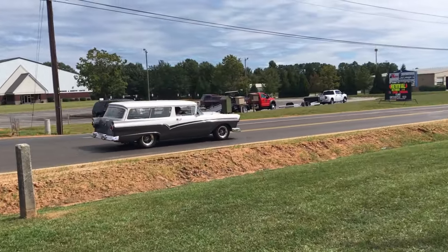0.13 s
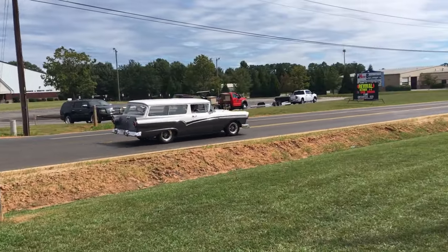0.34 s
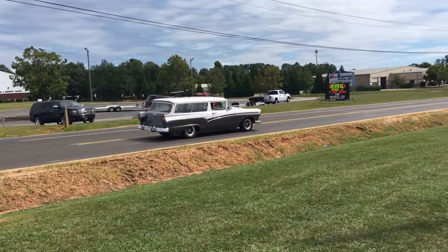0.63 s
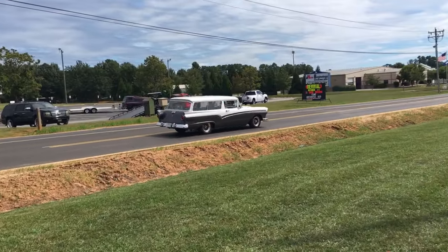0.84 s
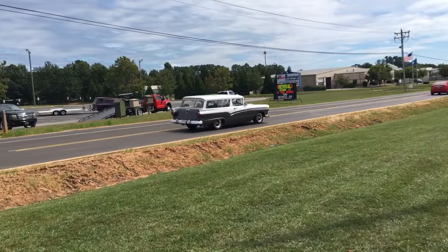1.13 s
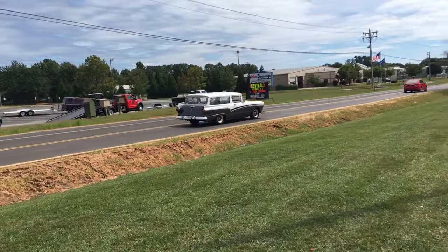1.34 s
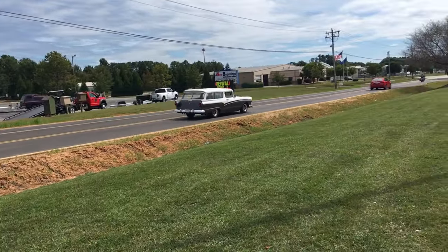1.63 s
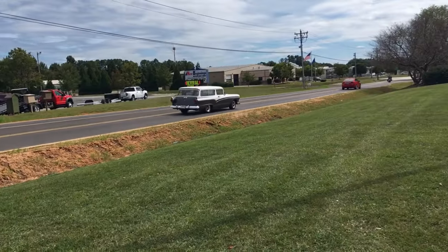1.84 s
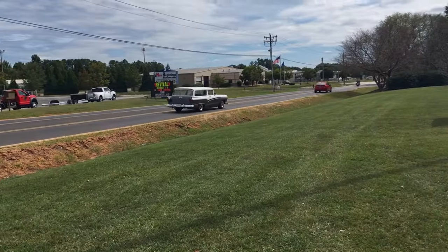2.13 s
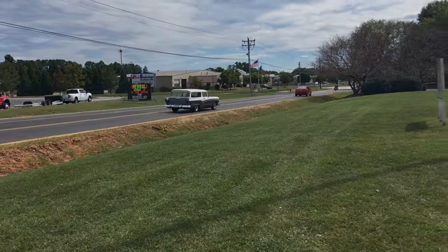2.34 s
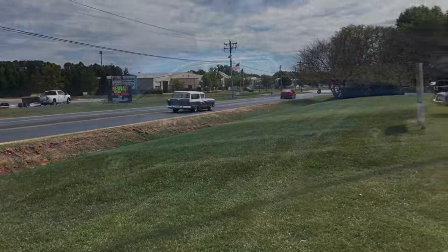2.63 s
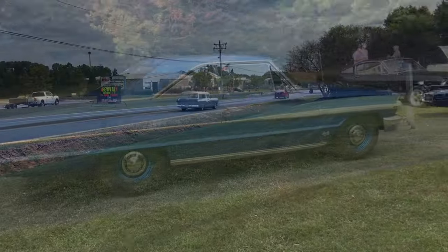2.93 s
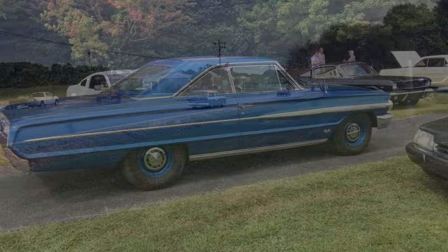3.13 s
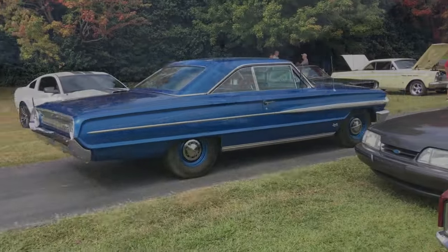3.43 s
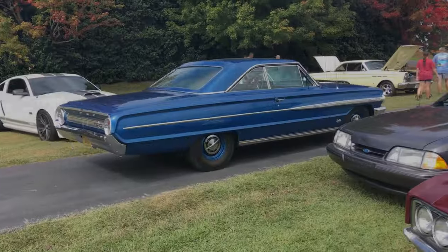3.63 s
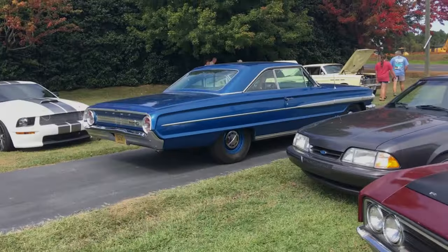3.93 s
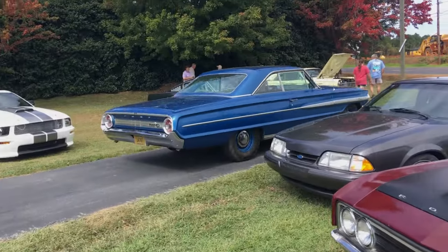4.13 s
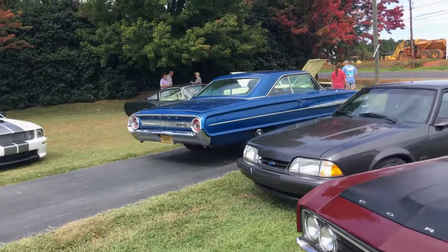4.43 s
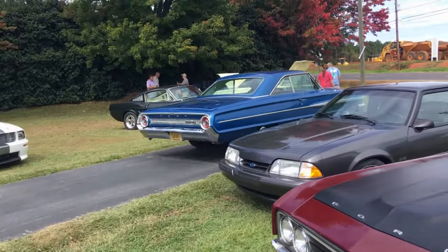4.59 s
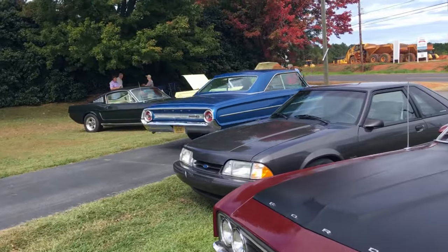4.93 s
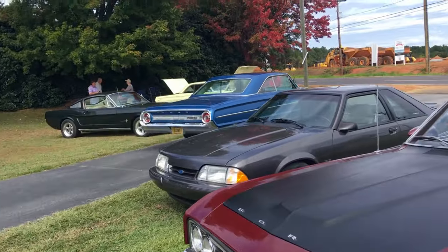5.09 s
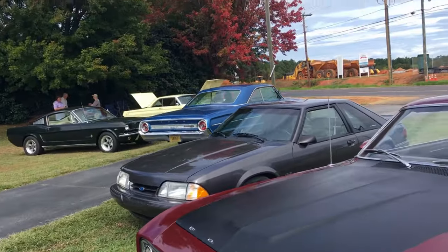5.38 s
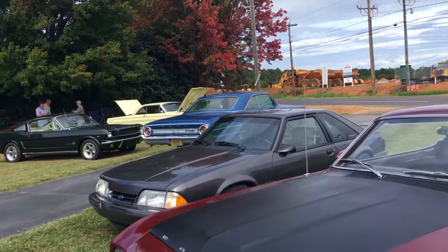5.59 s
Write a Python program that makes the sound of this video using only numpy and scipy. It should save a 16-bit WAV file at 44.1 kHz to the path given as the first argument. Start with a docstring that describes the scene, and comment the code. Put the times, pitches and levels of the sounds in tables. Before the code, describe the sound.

Outdoors at a roadside, a low rumble of distant traffic runs throughout. From the start, a classic V8 station wagon pulls away close by, its deep, uneven exhaust note rising slightly in pitch. The tailpipe rasps, pops and hisses over the roar of the tyres, and the car grows gradually quieter as it draws off. At about 2.7 seconds it lifts off the throttle, the pitch drops, and it fades out by 4 seconds. From around 3 seconds a second V8 blends in, creeping past at a slower, lumpy idle with brief stumbles. Its exhaust leaks hiss, spit and tick in step with the throb, and a loose metal part rattles lightly from about 3.4 seconds. Engine clatter grows stronger near 4.4 seconds and continues until the end, just before 6 seconds, with faint low drones in the distance.

```python
"""Roadside, outdoors, one microphone, over a low rumble of road and distant traffic. Close by, a V8 estate
car pulls away: its uneven firings sound the exhaust note and ring the pipe, the gas jet rasps, pops and
hisses, the tyres roar. At about 2.7 s, far off, it lifts off the throttle and fades. The sound dissolves
into a second V8 creeping past at a lumpy idle, its engine bay clattering, its exhaust leaks spitting
in step and a loose metal part rattling, with faint drones in the distance."""
import sys
import numpy as np
from scipy import signal
from scipy.fft import rfft, irfft, next_fast_len
from scipy.io import wavfile

SR = 44100
rng = np.random.default_rng(int(sys.argv[2]) if len(sys.argv) > 2 else 0)


def int16_out(signal):
    """Quantize to a 16-bit WAV file."""
    q = np.round(np.clip(np.atleast_2d(signal).T, -1, 1) * 32767)
    wavfile.write(sys.argv[1], SR, q.astype(np.int16))


N = 253559

# each bank fires unevenly, 270-180-90-180 degrees; per firing: (bank [0 near, 1 far])
FAR_BANK = [0, 1, 1, 0, 1, 0, 0, 1]
# tailpipe resonances: (frequency [Hz], width [Hz], level [dB])
TAILPIPE_MODES = [(1896, 150, -7), (2010, 194, -2.5), (2296, 400, -0.5), (2776, 500, -4), (2840, 1570, -10)]


def from_db(db):
    """Decibels to gain."""
    return 10 ** (np.asarray(db) / 20)


def rms_one(x):
    """Scale to rms 1."""
    return x / np.sqrt(np.mean(x ** 2) + 1e-20)


def in_time(rows):
    """Each column of a curve, sample by sample."""
    s, *columns = np.transpose(rows)
    return [np.interp(np.arange(N) / SR, s, c) for c in columns]


def drift(rate_hz):
    """Smooth random wander, rms 1."""
    r = np.exp(-80 * np.pi * rate_hz / SR)
    slow = signal.lfilter([1], [1, -2 * r, r * r], rng.standard_normal(N // 40 + 2002))[2000:]
    return np.interp(np.arange(N) / 40, np.arange(len(slow)), rms_one(slow))


def coloured(spectrum):
    """Noise with the given spectrum, rms 1."""
    hz, db = np.transpose(spectrum)
    size = next_fast_len(N)
    grid = np.maximum(np.fft.rfftfreq(size, 1 / SR), 1)
    gain = from_db(np.interp(np.log(grid), np.log(hz), db))
    return rms_one(irfft(rfft(rng.standard_normal(size)) * gain, size)[:N])


def resonances(x, modes):
    """Parallel resonators of alternating sign, each applied twice; rms 1."""
    out = 0
    for k, (hz, width, db) in enumerate(modes):
        r = np.exp(-np.pi * width / SR)
        b = (1 - r * r) / 2 * np.array([1, 0, -1])
        a = [1, -2 * r * np.cos(2 * np.pi * hz / SR), r * r]
        out += (-1) ** k * from_db(db) * signal.lfilter(b, a, signal.lfilter(b, a, x + 1e-18))
    return rms_one(out)


def puffs(clicks, decay_s, rise_s=.0035):
    """Each click opens quickly and dies away."""
    rise, decay = np.exp(-1 / (rise_s * SR)), np.exp(-1 / (decay_s * SR))
    return signal.lfilter([1 - rise], np.convolve([1, -rise], [1, -decay]), clicks + 1e-18)


def struck(events, modes, decay_s, scatter_db, rise_s=.0051, lean_db_per_octave=10):
    """Each event (s, dB, perhaps Hz) is a dying gust in every mode, weaker away from its own pitch."""
    s, level_db, *pitch = np.transpose(list(events))
    chance, gust, out = rng.standard_normal((len(s), len(modes))), rng.standard_normal(N), 0
    for k, (hz, width, db) in enumerate(modes):
        lean_db = sum(lean_db_per_octave * np.abs(np.log2(hz / own_hz)) for own_hz in pitch)
        clicks = np.zeros(N)
        clicks[(s * SR).astype(int)] = from_db(level_db + db - lean_db + scatter_db * chance[:, k])
        out += resonances(gust, [(hz, width, db)]) * puffs(clicks, decay_s, rise_s)
    return out


def tones(curves, waver_db):
    """One wavering sine for each curve of pitch and level."""
    out = 0
    for hz, db in map(in_time, curves):
        out += from_db(db + waver_db * drift(6)) * np.sin(2 * np.pi * np.cumsum(hz) / SR)
    return np.sqrt(2) * out


def shelf(x, top_db, corner_hz):
    """Change the level above the corner."""
    low = signal.sosfiltfilt(signal.butter(2, corner_hz, fs=SR, output="sos"), x)
    return low + from_db(top_db) * (x - low)


def jet_flutter(gusts_db=.9, grit_db=1.2):
    """Gain of a jet of gas: slow gusts and fast grit."""
    return from_db(gusts_db * drift(2.5) + grit_db * drift(130))


def crossings(turns):
    """Samples at which a running count passes a whole number."""
    return np.flatnonzero(np.diff(np.floor(turns))) + 1


def arrivals(start, lag):
    """Where in the cycle each firing reaches the microphone; the far bank's pipe lags."""
    return start + np.arange(8) / 8 + lag * np.array(FAR_BANK)


def firings(cycles, slot_db, start, lag, share, uneven_db):
    """One click a firing, its strength set by a share of its slot's level and by chance."""
    clicks, chance = np.zeros(N), rng.standard_normal(N)
    for db, turn in zip(slot_db, arrivals(start, lag)):
        at = crossings(cycles - turn)
        clicks[at] = from_db(share * db + uneven_db * chance[at])
    return clicks


def exhaust_note(cycles, levels_db, first_order, wobble_db, slot_db, start, lag, wander_rad=.35):
    """Multiples of the cycle rate, phased as eight pressure dips add up; each strays a little."""
    out, power = 0, 0
    for k, db in enumerate(levels_db, first_order):
        phase = np.angle(-from_db(slot_db) @ np.exp(-2j * np.pi * k * arrivals(start, lag)))
        gain, stray = from_db(db), drift(2)
        wave = np.cos(2 * np.pi * k * cycles + phase + wander_rad * stray[::-1])
        out += gain * from_db(wobble_db * stray) * wave
        power += gain ** 2 / 2
    return out / np.sqrt(power)


def pipe_bark(pulses, stage, waver_db=1.8):
    """Pulses ring the exhaust pipe; each resonance swells and sags on its own."""
    # (frequency [Hz], width [Hz], near [dB], midway [dB], far [dB], coasting [dB])
    pipe_modes = [(211.7, 14, 1.5, -5, -21, 2), (299, 17, -6, -11, -4, -1), (352, 28, -5.5, 0, -7.5, -6),
                  (424, 27, -9, -1, -8.5, -4.5), (500.8, 18, -3, -4.5, -7.5, -12),
                  (561, 30, 0.5, -2, -7, -6), (634.3, 27, 1.5, -2.5, 5.5, 1), (704.4, 29, 4, 3.5, 2.5, 3.5),
                  (778, 26, -4, -12.5, -6, 0), (839, 32, -9, 0, -12, -21), (955, 33, 1, -13, -17, -15)]
    out = 0
    for k, (hz, width, *stage_db) in enumerate(pipe_modes):
        db = np.interp(stage, [0, .5, 1, 2], stage_db) + waver_db * drift(4)
        out += (-1) ** k * from_db(db) * resonances(pulses, [(hz, width, 0)])
    return .3 * out


def panel_ring(pulses):
    """A panel sings along with the pulses while the car is near."""
    # (time [s], level [dB])
    panel_level = [(0, -52), (.3, -50.5), (.47, -47.5), (.7, -60), (1.0, -51), (1.4, -57), (2.5, -62),
                   (2.8, -82)]
    # (frequency [Hz], width [Hz], level [dB])
    panel_modes = [(1084, 17, 10.5), (1132, 22, 1.5), (1216, 29, -8.5)]
    return from_db(in_time(panel_level)[0]) * resonances(pulses, panel_modes)


def tailpipe_rasp(jet, rasp_db, stage):
    """The jet rasps in the tailpipe, with faint whistles and a middle band that flares up."""
    # upper modes over lower: (near [dB], far [dB], coasting [dB])
    upper_db = [-6.5, -2.5, -6]
    # (frequency [Hz], width [Hz])
    whistles = [(3950, 90), (5325, 120), (6050, 140)]
    # (time [s], level of each whistle [dB])
    whistle_levels = [(0, -56, -54, -61), (.45, -67, -59, -66), (.62, -58, -60, -64), (1.1, -61, -64, -71),
                      (1.6, -60, -60, -74), (2.3, -65, -64, -65), (3.0, -84, -77, -83)]
    # (time [s], level [dB])
    flare_level = [(.3, -66), (.43, -46.5), (.62, -47.5), (.85, -49), (1.0, -55), (1.2, -51), (1.6, -54),
                   (2.0, -64), (2.7, -58), (2.9, -60), (3.1, -80)]
    # (frequency [Hz], width [Hz], level [dB])
    flare_modes = [(2120, 190, -13), (2330, 110, 1)]
    upper = from_db(np.interp(stage, [0, 1, 2], upper_db)) * resonances(jet, TAILPIPE_MODES[3:])
    out = from_db(rasp_db) * (resonances(jet, TAILPIPE_MODES[:3]) - upper)
    for (hz, width), db in zip(whistles, in_time(whistle_levels)):
        out += from_db(db) * resonances(jet, [(hz, width, 0)])
    return out + from_db(in_time(flare_level)[0]) * resonances(jet, flare_modes)


def tailpipe_pops(rasp_db, count=80, spread_db=6):
    """Pops ring the tailpipe: small ones at random, the loudest at set times."""
    # (time [s], level [dB], strongest near [Hz])
    loud_pops = [(.137, -37, 1950), (.2, -34, 2190), (.444, -39, 2280), (.482, -36, 2100),
                 (.512, -34, 2080), (.58, -32, 2030), (.646, -37, 2060), (.741, -34.5, 2260),
                 (.761, -34.5, 2100), (.813, -33, 2040), (1.064, -41, 2600), (1.092, -47, 2050),
                 (1.162, -40, 2020), (1.218, -35, 2110), (1.374, -38, 1950), (1.457, -50, 1960),
                 (1.489, -45, 2500), (1.537, -37, 1960), (1.564, -43, 2100), (1.612, -37, 2600),
                 (1.641, -34, 2300), (1.682, -36, 2130), (1.729, -39, 2600), (1.766, -33.5, 2610),
                 (1.805, -40, 2370), (1.869, -35, 2220), (2.07, -36, 3200), (2.157, -40, 3100),
                 (2.218, -31.5, 1900), (2.29, -38, 3000), (2.369, -33, 2820)]
    s = rng.uniform(0, 2.8, count)
    small_db = rasp_db[(s * SR).astype(int)] - 2.5 + spread_db * rng.uniform(-1.5, 1.5, count)
    small = struck(zip(s, small_db), TAILPIPE_MODES, decay_s=.009, scatter_db=3)
    return small + struck(loud_pops, TAILPIPE_MODES, decay_s=.011, scatter_db=1.8)


def tailpipe_ticks(clicks, rasp_db, stage, spread_db=5.5):
    """Each firing ticks sharply in the tailpipe."""
    # (frequency [Hz], width [Hz], level [dB])
    tick_modes = [(2757, 320, -2.5), (3234, 175, 3.5), (5400, 710, -9), (7200, 1500, -9.5)]
    # ticks over the rasp: (near [dB], far [dB], coasting [dB])
    over_db = [-7, 2.5, -7]
    at = np.flatnonzero(clicks)
    db = rasp_db + np.interp(stage, [0, 1, 2], over_db) + spread_db * rng.uniform(-1.6, 1, N)
    return struck(zip(at / SR, db[at]), tick_modes, decay_s=.002, scatter_db=2, rise_s=.0006)


def exhaust_hiss(cycles, clicks, swell, hiss_db, spread_db=6.5, top_db_per_s=-1):
    """Gas hisses with the firings and spits three times a cycle; distance dulls the hiss."""
    # (frequency [Hz], density [dB])
    hiss_spectrum = [(1940, -6.5), (3300, -81), (3740, -17), (4040, 0.5), (4910, 1), (5210, -2),
                     (6010, 5.5), (7860, -2.5), (8950, 3), (9800, -2.5), (10350, -9), (10900, -5),
                     (12200, 0.5), (15100, -31), (15700, -13)]
    # (place [cycles], level over the hiss [dB])
    cycle_spits = [(0.171, 1.5), (.43, -0.5), (0.533, -15)]
    # (time [s], level [dB], strongest near [Hz])
    loud_spits = [(.033, -37, 6600), (.172, -36, 6540), (.279, -38, 7500), (.36, -39, 5900),
                  (.445, -37, 6350), (.528, -35, 6000), (.773, -36, 6350), (.937, -37, 6000),
                  (1.012, -40, 6000), (1.252, -52, 5900), (1.546, -50, 5550), (2.005, -54, 5800),
                  (2.098, -40, 5940), (2.172, -41, 5700), (2.249, -40, 6130), (2.327, -49, 6800)]
    # (frequency [Hz], width [Hz], level [dB])
    spit_bands = [(2770, 390, -2), (4540, 900, 1.5), (5530, 1200, 1.5), (6830, 1060, 1), (9200, 3100, -8)]
    pulsing = 1.1 + rms_one(puffs(clicks, decay_s=.006))
    hiss = rms_one(coloured(hiss_spectrum) * jet_flutter() * swell * pulsing)
    out = from_db(hiss_db) * shelf(hiss, top_db_per_s * np.arange(N) / SR, corner_hz=9000)
    spits, chance = [], rng.uniform(-1, 1, N)
    for place, db in cycle_spits:
        at = crossings(cycles - place)
        spits += zip(at / SR, hiss_db[at] + db + spread_db * chance[at])
    out += struck(spits, spit_bands, decay_s=.0055, scatter_db=2.5)
    return out + struck(loud_spits, spit_bands, decay_s=.0039, scatter_db=3.5)


def tyre_roar(bark_db, sink_db_per_s=1):
    """Tyres roar on the road, fading a little faster than the bark."""
    # (frequency [Hz], density [dB])
    tyre_spectrum = [(170, -35), (250, -16), (320, 4.5), (420, -6.5), (600, 3), (800, 3), (1100, -5),
                     (1300, -5.5), (1550, -14), (1900, 1), (2600, -20)]
    return from_db(bark_db + 3 - sink_db_per_s * np.arange(N) / SR) * coloured(tyre_spectrum)


def road_rumble():
    """Low rumble of the road and distant traffic."""
    # (frequency [Hz], density [dB])
    rumble_spectrum = [(20, -29), (40, -13), (60, -1.5), (100, -3.5), (140, -8), (200, -14), (330, -30.5),
                       (480, -34), (700, -75)]
    # (time [s], level [dB])
    rumble_level = [(0, -37.5), (1.5, -37), (2.6, -38.5), (3.2, -41.5), (4.0, -43), (4.6, -45), (5.75, -44)]
    return from_db(in_time(rumble_level)[0]) * coloured(rumble_spectrum)


def pipe_song():
    """The pipe sings clear tones as the car draws away."""
    # per tone: (time [s], frequency [Hz], level [dB])
    pipe_tones = [
        [(1.3, 622, -72), (1.55, 630, -57), (1.9, 632, -54), (2.2, 633, -52), (2.5, 624, -66), (2.7, 625, -79)],
        [(.9, 702, -74), (1.3, 701.4, -61.5), (1.7, 704, -53.5), (1.95, 707, -55), (2.2, 700, -71)],
        [(.85, 783, -78), (1.0, 780, -58), (1.25, 799, -55), (1.45, 803, -55), (1.6, 804, -73)],
    ]
    return tones(pipe_tones, waver_db=2.5)


def leaving_car():
    """The first V8 pulls away from the microphone and coasts; its firings drive the exhaust."""
    # (time [s], note [dB], bark [dB], rasp [dB], hiss [dB])
    levels = [(0, -23, -41.5, -49, -50), (.7, -24, -43.5, -46, -52), (1.6, -24.5, -45, -46.5, -51),
              (2.3, -28.5, -48.5, -50, -52), (2.6, -30.5, -50, -55, -59.5), (2.8, -30.5, -52, -53, -61),
              (3.1, -32.5, -55.5, -60.5, -60.5), (3.6, -39.5, -70, -65, -88), (4.1, -63, -95, -70, -93)]
    # (time [s], engine speed [cycles/s])
    speed = [(0, 12.038), (.654, 12.238), (1.201, 12.643), (1.361, 12.644), (1.516, 12.904),
             (2.454, 13.469), (2.783, 11.903), (3.53, 11.051), (3.7, 10.346)]
    # (time [s], stage [0 near and pulling, 1 far and pulling, 2 coasting])
    stages = [(0, 0), (.5, 0), (1.3, .5), (2.0, 1), (2.62, 1), (2.76, 2)]
    # multiples 4 to 24 of the cycle rate: (near [dB], far [dB], coasting [dB])
    orders = [(-18, -20, -18), (-1, 1, -15), (-1, -7, -14), (-1, -7, -9), (2, -6, 0), (-4, -13, -15),
              (-12, -11, -20), (-6, 2, -17), (-18, -23, -18), (-8, -8, -13), (-17, -30, -20),
              (-17, -25, -23), (-21, -16, -30), (-16, -27, -24), (-22, -28, -28), (-22, -26, -30),
              (-28, -33, -30), (-34, -32, -40), (-33, -24, -36), (-28, -28, -24), (-27, -40, -33)]
    # eight firings: (slot_db [dB each], start [cycles], lag of the far bank [cycles])
    firing = dict(slot_db=[-7.7, -8.7, 5.6, 2.2, -17.4, -2.5, 4.2, 4.5], start=.28, lag=.094)
    # turbulence in the pulses: (near, midway, far, coasting) [gain]
    turbulence = [.5, .22, .2, .35]
    note_db, bark_db, rasp_db, hiss_db = in_time(levels)
    cycles = np.cumsum(in_time(speed)[0]) / SR
    stage, = in_time(stages)
    orders_db = [np.interp(stage, [0, 1, 2], row) for row in orders]
    out = from_db(note_db) * exhaust_note(cycles, orders_db, first_order=4, wobble_db=1.3, **firing)
    clicks = firings(cycles, share=.5, uneven_db=.9, **firing)
    gas = rms_one(puffs(clicks, decay_s=.045)) * rng.standard_normal(N)   # turbulence behind each pulse
    pulses = rms_one(clicks) + np.interp(stage, [0, .5, 1, 2], turbulence) * gas
    out += from_db(bark_db) * pipe_bark(pulses, stage) + panel_ring(pulses) + pipe_song()
    swell = from_db(2.2 * np.cos(2 * np.pi * (cycles - .368)))   # rasp and hiss swell once a cycle
    jet = (.4 * rms_one(clicks) + gas + .8 * rng.standard_normal(N)) * swell ** .5
    out += tailpipe_rasp(jet, rasp_db, stage)
    out += tailpipe_pops(rasp_db) + tailpipe_ticks(clicks, rasp_db, stage)
    return out + exhaust_hiss(cycles, clicks, swell, hiss_db) + tyre_roar(bark_db)


def engine_bay(blow, clatter_db, ring_db):
    """Clatter and a whirr as of belts and fan, both pulsing lightly with the firings."""
    # (frequency [Hz], density [dB])
    clatter_spectrum = [(150, -11.5), (200, -0.5), (260, 1.5), (455, -5), (699, 0.5), (784, -0.5), (892, 0),
                        (1330, -3.5), (1560, -7), (1780, -7.5), (2170, -13), (3290, -12), (4380, -20.5),
                        (4980, -54), (6180, -17.5), (8000, -59), (10400, -54), (17600, -120)]
    # (frequency [Hz], width [Hz], level [dB])
    whirr_modes = [(1520, 110, 0), (1950, 120, -7), (2620, 200, -4)]
    clatter = from_db(clatter_db) * rms_one(coloured(clatter_spectrum) * (9.5 + blow))
    whirr_gain = from_db(ring_db + 1 + 1.5 * drift(8)) * (.8 + .15 * blow)
    return clatter + whirr_gain * resonances(rng.standard_normal(N), whirr_modes)


def exhaust_leak(cycles, blow, leak_db, ring_db, early_cycles=.016, spread_db=3.5):
    """Gas hisses out of the leak and spits, ringing, at eight even steps a cycle."""
    # (frequency [Hz], density [dB])
    leak_spectrum = [(2940, 3), (5000, -3.5), (5320, -2), (6540, -1.5), (7500, -5), (8600, -3), (9600, 0),
                     (10300, -4), (11200, -0.5), (13300, 1), (15100, -0.5), (15700, 7)]
    # steps of two cycles: (treble over the leak [dB], ring over its level [dB])
    spit_pattern = [(10.5, -13), (-24, -1), (14, 4.5), (10, -9), (-4, 1), (10.5, 5.5), (15.5, 0),
                    (-16, -11), (11, -31), (7.5, -2), (-25, -13), (16.5, -4), (-9, 0.5), (-4, -30),
                    (15, -22), (6, 2)]
    # (time [s], level [dB], strongest near [Hz])
    loud_spits = [(3.26, -51, 4350), (3.463, -62, 1610), (3.528, -51, 3200), (3.749, -50, 2850),
                  (3.846, -57, 2850), (4.096, -50.5, 3300), (4.159, -49.5, 2800), (4.273, -57, 2600),
                  (4.374, -53, 4000), (4.387, -45, 1560), (4.407, -46.5, 3330), (4.469, -47, 2610),
                  (4.54, -51, 4200), (4.56, -43.5, 1990), (4.58, -50, 1560), (4.679, -49, 3200),
                  (4.715, -50, 2380), (4.778, -55, 1630), (4.795, -50, 3300), (4.868, -51, 3200),
                  (4.988, -63, 3000), (5.025, -48, 3280), (5.087, -46.5, 3300), (5.301, -63, 1610),
                  (5.713, -50, 2760)]
    # (frequency [Hz], width [Hz], level [dB])
    spit_modes = [(1605, 190, 4), (1960, 340, 0.5), (2826, 590, 5), (3190, 480, 0), (4290, 420, -1.5),
                  (6200, 1300, -3.5)]
    steps = 8 * (cycles + early_cycles)
    at = crossings(steps)
    over_db = np.array(spit_pattern)[steps[at].astype(int) % len(spit_pattern)]
    over_db = over_db + spread_db * rng.uniform(-1, 1, (len(at), 2))
    treble = np.zeros(N)
    treble[at] = from_db(over_db[:, 0])
    pulsing = 1.14 + .36 * blow + puffs(treble, decay_s=.014, rise_s=.01)
    hiss = from_db(leak_db) * coloured(leak_spectrum) * jet_flutter() * pulsing
    top_db = -6.5 + 2.3 * (leak_db + 58.5)   # the top rises and falls faster than the rest
    out = shelf(hiss, top_db, corner_hz=9700)
    out += struck(zip(at / SR, ring_db[at] + over_db[:, 1]), spit_modes, decay_s=.011, scatter_db=1.5)
    return out + struck(loud_spits, spit_modes, decay_s=.01, scatter_db=1.5, rise_s=.0012)


def creeping_car():
    """The second V8 creeps past the microphone; its throb drops out where the idle stumbles."""
    # (time [s], throb [dB], clatter [dB], leak hiss [dB], leak ring [dB])
    levels = [(2.4, -82, -86, -63, -64), (2.9, -48, -61, -59, -68), (3.4, -31.5, -56.5, -56.5, -59.5),
              (3.9, -30, -56, -56.5, -58), (4.4, -30.5, -49, -58.5, -58.5), (5.0, -33, -50, -60, -60.5),
              (5.75, -33, -50, -62, -65)]
    # (time [s], engine speed [cycles/s])
    speed = [(2.9, 6.505), (3.018, 5.86), (4.005, 6.45), (4.354, 6.298), (4.502, 6.532), (5.488, 6.363),
             (5.75, 6.215)]
    # multiples 6 to 21 of the cycle rate: (level [dB])
    orders_db = [-38, -3.5, 11, -6, 0, -6, -53, -46, -32, -18.5, -32, -24, -60, -29, -27, -54]
    # eight firings: (slot_db [dB each], start [cycles], lag of the far bank [cycles])
    firing = dict(slot_db=[1.4, -13, 1, -3.5, -.1, -3, -2.7, -3.8], start=.55, lag=.156)
    # (time [s], depth [dB], half length [s]); a negative depth is a surge
    stumbles = [(3.043, -8, 0.022), (3.137, 18, 0.018), (3.324, 15, 0.017), (3.386, 10, 0.011),
                (3.483, 11, 0.015), (3.795, 15, 0.013), (4.039, 12, 0.014), (4.315, 5, 0.056),
                (4.968, 18, 0.016), (4.647, 2, 0.026), (5.165, 8, 0.01), (5.26, 11, 0.014),
                (5.415, 9, 0.013), (5.498, 18, 0.025), (5.572, 22, 0.014), (5.662, 6, 0.023),
                (5.75, 6, 0.051)]
    throb_db, clatter_db, leak_db, ring_db = in_time(levels)
    cycles = np.cumsum(in_time(speed)[0]) / SR
    throb = exhaust_note(cycles, orders_db, first_order=6, wobble_db=.9, **firing)
    dips_db = sum(db * np.exp(-((np.arange(N) / SR - s) / half_s) ** 2) for s, db, half_s in stumbles)
    clicks = firings(cycles, share=.4, uneven_db=4, **firing)
    blow = rms_one(puffs(clicks, decay_s=.008))
    out = from_db(throb_db - dips_db) * throb + engine_bay(blow, clatter_db, ring_db)
    return out + exhaust_leak(cycles, blow, leak_db, ring_db) + metal_rattle() + leak_ticks()


def far_drones():
    """Faint drones far off, steady or gliding, perhaps other engines."""
    # per drone: (time [s], frequency [Hz], level [dB])
    drones = [
        [(2.9, 121, -75), (3.15, 121, -46), (3.7, 120.4, -48), (3.85, 120, -56), (4.1, 120, -75)],
        [(4.1, 84.5, -75), (4.5, 84.2, -48), (5.0, 83.6, -45), (5.4, 83.4, -42), (5.75, 83, -43)],
        [(3.7, 128, -75), (3.85, 136, -50), (4.0, 149, -49), (4.17, 158, -50), (4.3, 156, -75)],
        [(2.7, 210, -75), (3.1, 208, -52), (3.3, 204, -70), (3.75, 203, -58), (4.03, 212, -55),
         (4.25, 200, -56), (4.5, 200, -64), (5.2, 200, -75)],
    ]
    return tones(drones, waver_db=1)


def leak_ticks():
    """The leak ticks sharply in the treble."""
    # (time [s], level [dB], strongest near [Hz])
    ticks = [(3.0475, -47, 6000), (3.228, -59, 12400), (3.252, -47.5, 11440), (3.315, -55, 13000),
             (3.335, -54, 13000), (3.378, -50, 13000), (3.4586, -41, 11500), (3.522, -48, 11900),
             (3.605, -51, 12500), (3.643, -50, 11000), (3.7015, -59, 11500), (3.741, -58, 7000),
             (3.78, -53, 8000), (3.86, -50, 7950), (3.96, -53, 10000), (4.037, -62, 7500),
             (4.177, -53, 6460), (4.275, -49, 6500), (4.3725, -50, 6200), (4.408, -52, 6500),
             (4.488, -53, 6150), (4.563, -47.5, 6500), (4.68, -49.5, 6200), (4.739, -53, 6300),
             (4.797, -48.5, 6360), (4.891, -57, 6500), (4.964, -56, 6200), (5.05, -54, 7000),
             (5.084, -54, 7300), (5.168, -57, 6500), (5.203, -51.5, 6800), (5.2645, -51, 6500),
             (5.302, -55, 6100), (5.615, -56, 5880)]
    # (frequency [Hz], width [Hz], level [dB])
    tick_modes = [(5300, 730, -8), (6020, 720, 1), (6870, 690, -1), (8350, 1300, -4.5), (11700, 2100, -1),
                  (14100, 2900, 3)]
    return struck(ticks, tick_modes, decay_s=.006, scatter_db=2.5, rise_s=.001)


def metal_rattle():
    """A loose metal part rings briefly at each knock."""
    # (time [s], level [dB])
    knocks = [(3.428, -60), (3.462, -50), (3.5572, -52), (3.6056, -51), (3.6505, -51), (3.7483, -47),
              (3.963, -47), (4.0616, -51), (4.178, -47.5), (4.2297, -49), (4.2746, -56), (4.373, -42.5),
              (4.407, -40.5), (4.5415, -53), (4.987, -51), (5.0244, -57), (5.0873, -44), (5.1706, -60),
              (5.2045, -48), (5.2619, -52), (5.3008, -46.5), (5.5153, -55)]
    # (frequency [Hz], width [Hz], level [dB])
    metal_modes = [(1545, 110, -6), (4380, 340, -4.5)]
    return struck(knocks, metal_modes, decay_s=.012, scatter_db=2, rise_s=.001)


def scene():
    """Both cars and the roadside at one microphone."""
    return (leaving_car() + creeping_car() + road_rumble() + far_drones())[None]


def record(dry):
    """A steep low-pass cuts the top treble."""
    cutoff_hz = 15960
    return signal.sosfilt(signal.cheby2(20, 70, cutoff_hz, fs=SR, output="sos"), dry)


dry = scene()
out = record(dry)
int16_out(out)
```